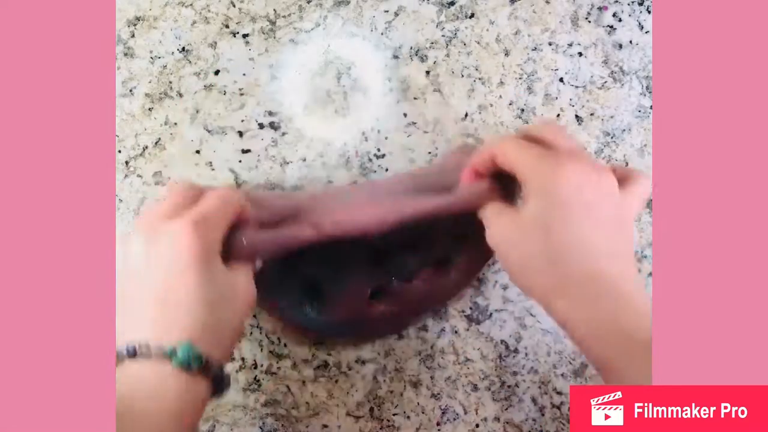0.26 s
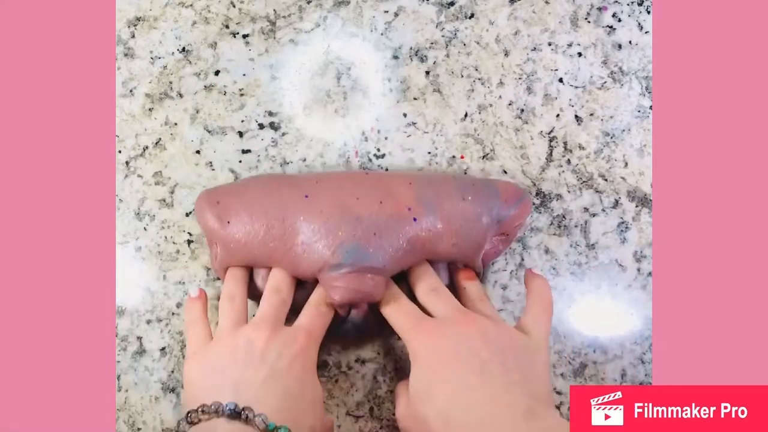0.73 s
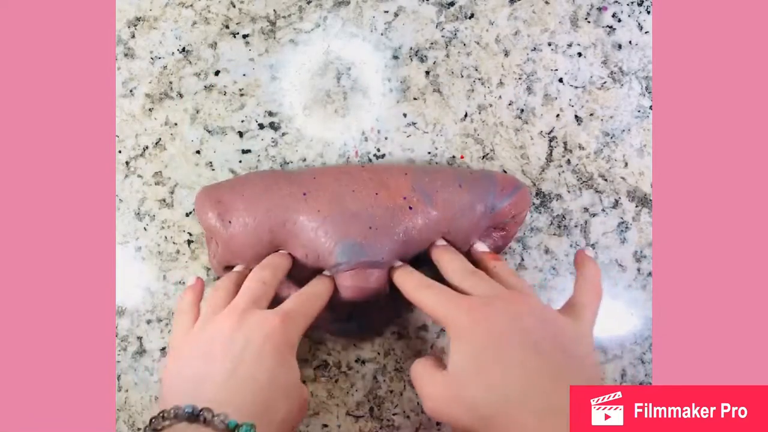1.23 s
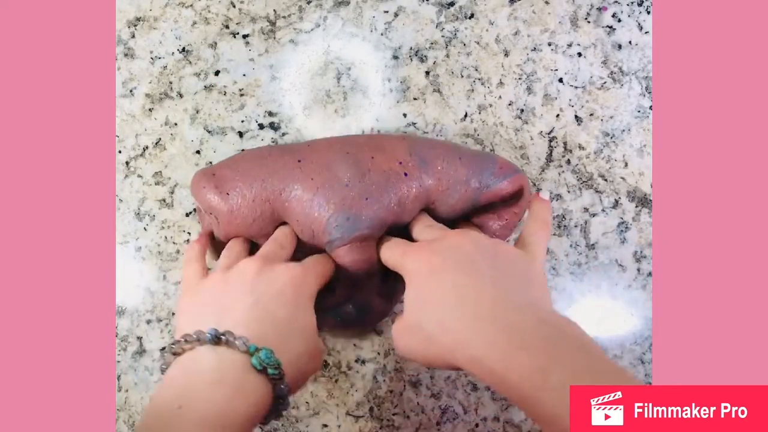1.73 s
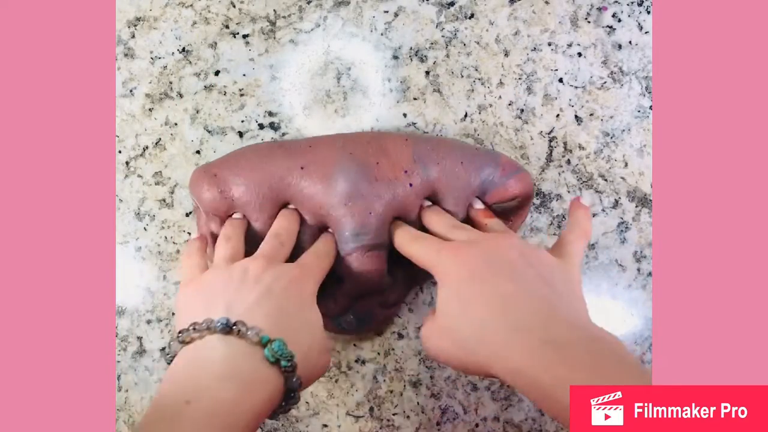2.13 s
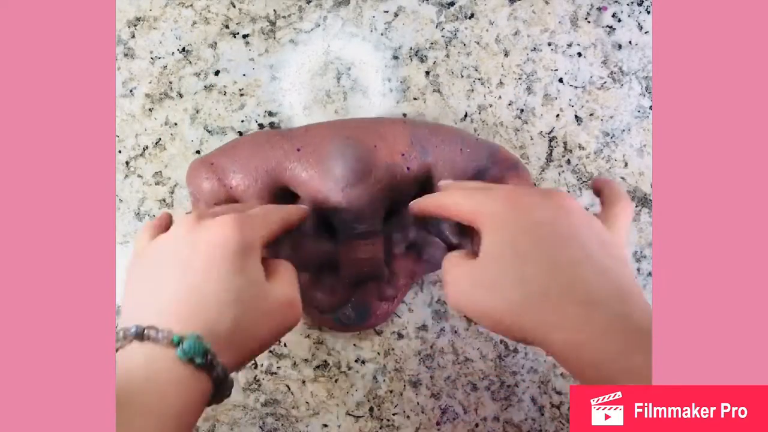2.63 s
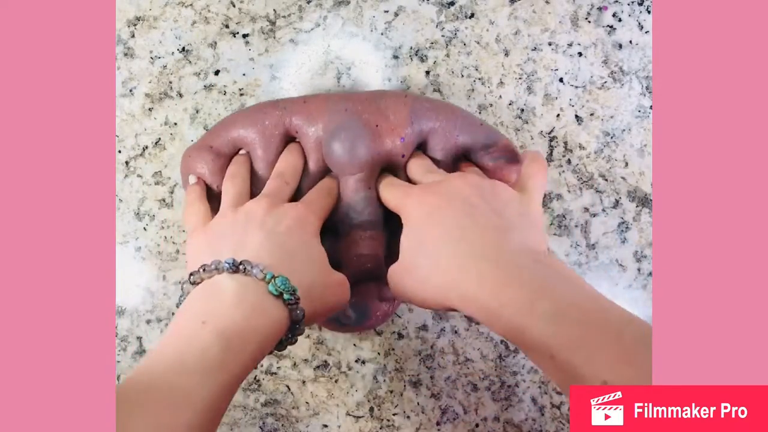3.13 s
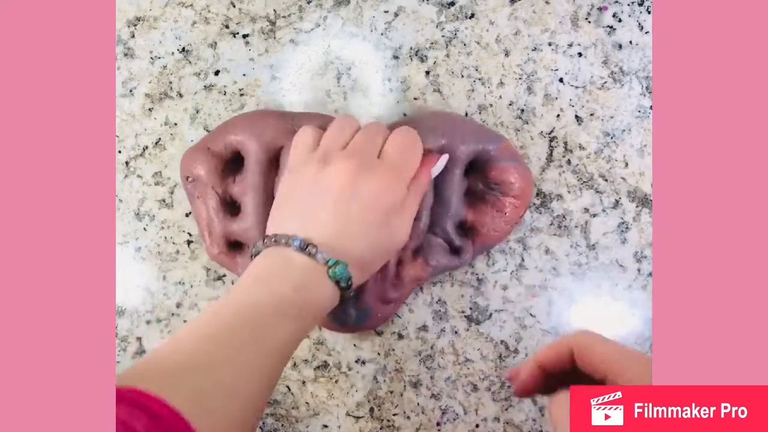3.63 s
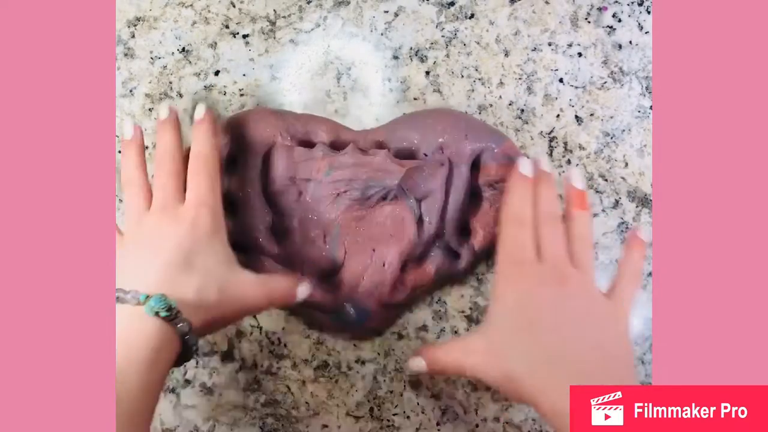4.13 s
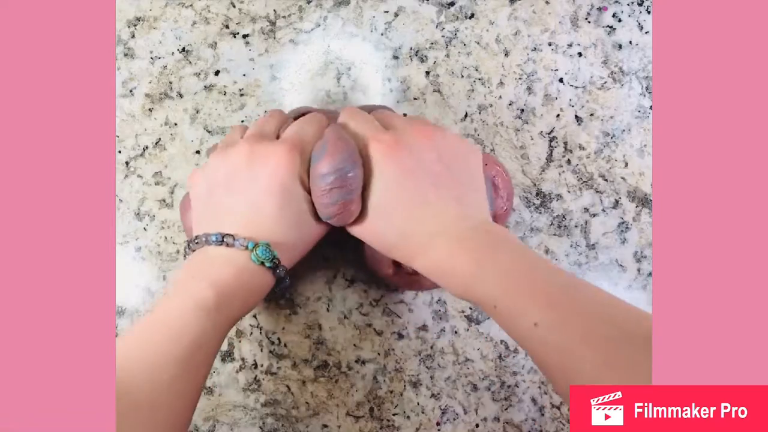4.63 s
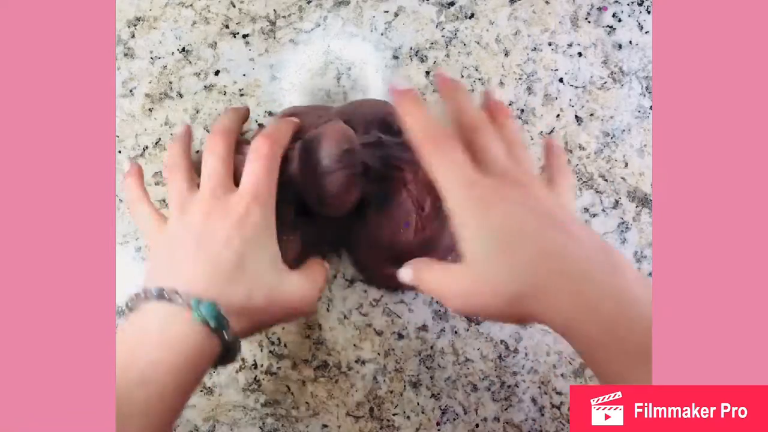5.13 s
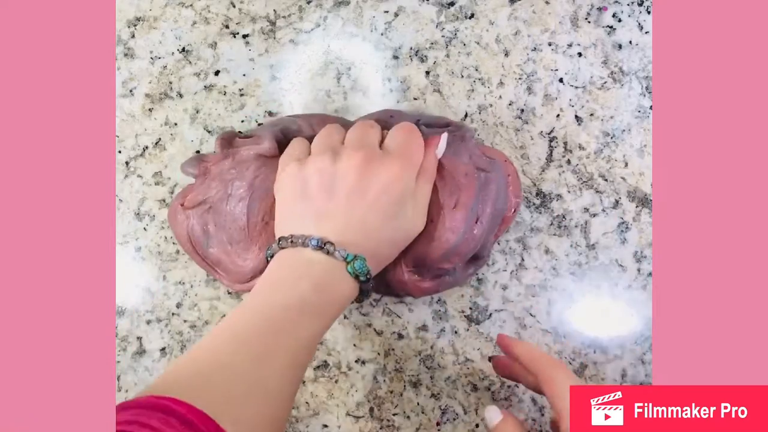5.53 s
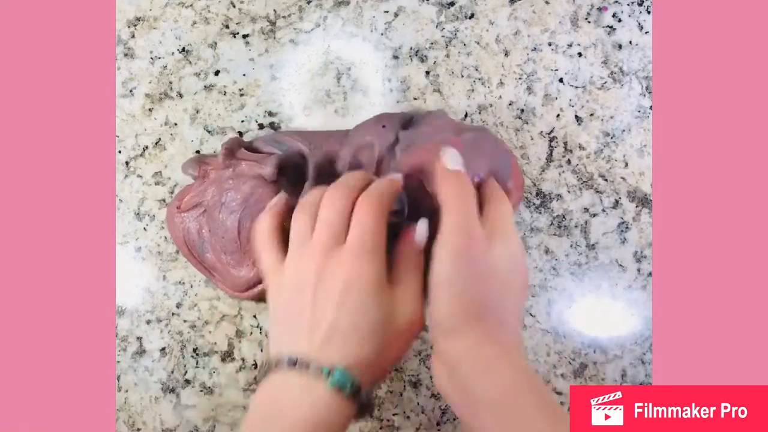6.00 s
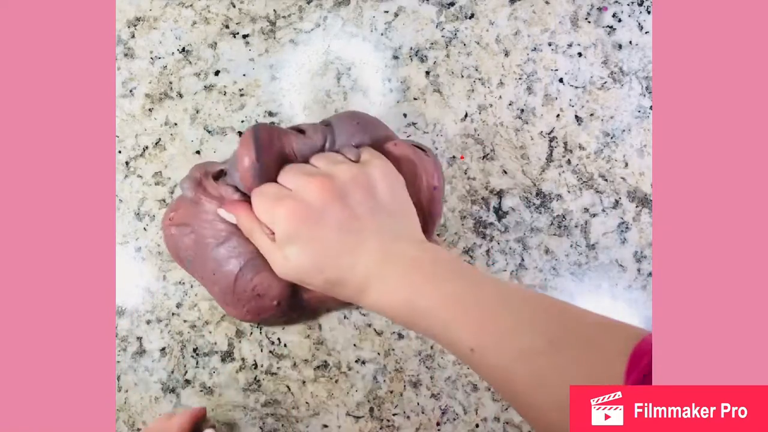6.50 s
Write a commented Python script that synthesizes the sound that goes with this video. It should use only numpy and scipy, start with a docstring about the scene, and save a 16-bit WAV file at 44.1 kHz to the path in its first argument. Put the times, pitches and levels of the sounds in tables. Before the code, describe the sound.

Sticky slime pops and crackles wetly as hands poke, fold and squeeze it on a stone counter, with a few dull thuds.

```python
"""Sticky slime pops and crackles as hands poke, fold and squeeze it on a stone counter.
Trapped air pockets burst with short pops, and the slime peels off the fingers in a wet crackle
with squelching below. The counter carries dull pushes and a few jolts. A small hard room
echoes the pops, over a quiet hum and hiss."""
import sys
import numpy as np
from scipy import signal
from scipy.fft import rfft, irfft, next_fast_len
from scipy.io import wavfile
from scipy.ndimage import uniform_filter1d, map_coordinates

SR = 44100
rng = np.random.default_rng(int(sys.argv[2]) if len(sys.argv) > 2 else 0)


def materialize(psi):
    """Save the field psi as 16-bit PCM at rate SR to the path in sys.argv[1].

    A 1-D psi becomes a single channel; in a 2-D psi each row is a channel.
    """
    bounded = np.clip(np.atleast_2d(psi).T, -1, 1)
    quanta = np.round(bounded * 32767).astype(np.int16)
    wavfile.write(sys.argv[1], SR, quanta)


N = 298116

# Quick echoes off hands, counter and phone: (frequency [Hz], time to fade by 60 dB [s])
NEAR_ECHO = [(200, 0.04), (2000, 0.039), (10000, 0.018)]
# The small room's echo: (frequency [Hz], time to fade by 60 dB [s])
ROOM_ECHO = [(300, 0.18), (10000, 0.093)]
# Bursting air pockets; boom and snap are relative to the pocket's puff of air:
# (time [s], level [dB], pitch [Hz], boom [dB], snap [dB])
AIR_POCKETS = [(0.671, -20, 750, 4, -36), (0.935, -5, 2640, 5, -5), (0.9474, -1.5, 970, -36, -48),
               (0.9548, -10.5, 4500, -2, -24), (1.182, -33.5, 1800, 3, -4), (1.238, -31, 2050, 7, -9),
               (1.4159, -34, 820, 13.5, -30), (1.527, -28, 3900, -19, -52), (1.7322, -15.5, 2600, 6, -5),
               (1.7534, -6, 795, -3, -12), (1.7629, -2.5, 2850, -27, 5), (1.766, -9, 2420, -34, 5),
               (1.7702, -25, 3000, -20, -6), (1.7753, -11.5, 2310, 8.5, -28), (2.499, -30, 5500, -15, -22),
               (2.5064, -8.5, 1165, -6, -24), (2.517, -21.5, 2000, 12, -5), (2.5206, -5, 3500, -3, -6.5),
               (2.5303, -0.5, 1830, -27, -7.5), (2.544, -18.5, 2500, 8.5, -17),
               (2.549, -14.5, 2500, 8, -13), (2.5785, -10, 3000, -6, 0), (2.593, -22.5, 3480, 9, -5),
               (2.8074, -31.5, 1295, 3.5, -15), (3.253, 3.5, 2620, -5.5, -44), (3.2678, -3, 1500, -3, -12),
               (3.2939, -2.5, 3380, 9.5, 2.5), (3.534, -23.5, 1770, -7.5, -21), (3.6023, 7, 826, -3, -60),
               (3.628, 3.5, 1510, -5, -55), (3.6606, -38, 1920, -4, 16.5),
               (3.7068, -17.5, 2200, -2.5, -8.5), (3.742, -25, 2020, -11, 3.5),
               (3.7894, -47, 2400, 2.5, 12.5), (3.9065, -15.5, 3070, -9.5, -2), (4.2221, -27, 1740, 5, -32),
               (4.325, -41.5, 3200, 1, 30.5), (4.4132, -38, 3310, 13, 13), (4.4296, -4.5, 2130, -5, -49),
               (4.4975, -24.5, 1700, -10, -8), (4.5497, -29, 2460, -20, -1), (4.5773, -8, 1570, -2, -7),
               (4.6622, -22.5, 2870, -20, 0), (4.6723, -26.5, 3940, -23, 17), (4.7101, -8.5, 4660, -36, 5),
               (4.7246, -19, 4590, -2.5, 27.5), (4.752, -32, 3770, -19, 5), (4.8148, -19.5, 3830, -59, -18),
               (4.8386, -19.5, 3500, -9, 3.5), (4.9751, -7, 3030, -40, -36),
               (5.381, -14.5, 1300, -0.5, -50), (5.4387, -19, 3320, -5, -4),
               (5.4804, -15.5, 3750, -2.5, 0.5), (5.5418, -32, 2940, -2, 8.5),
               (5.562, 17, 3480, -11.5, -2.5), (5.6808, -20, 2660, -7.5, -6.5),
               (5.755, -37.5, 2500, -25.5, 0.5), (6.198, -29, 1330, -19, -27.5),
               (6.2283, -22.5, 1600, 0.5, -3), (6.3101, -20.5, 2500, -31, 0.5),
               (6.3556, -25, 3000, -13, -12), (6.365, -15.5, 1240, 10, -3.5), (6.3778, -18.5, 3500, 0, 2),
               (6.389, -24.5, 1110, 18, -2), (6.409, -25.5, 2500, -14, -1), (6.4253, -27.5, 4000, -18, 7),
               (6.436, -34, 4000, -18, 6), (6.4433, -7.5, 3800, 0, -6.5), (6.4614, -2, 4150, -6, -4.5),
               (6.499, -28, 3180, 7, 13), (6.5189, -16, 3630, -28, 7), (6.5939, -21, 3250, -20, 5.5)]


def pops():
    """Each pocket tears open: a puff pitched by its size, a snap of wet film, the finger hole booming."""
    out, t = np.zeros(N + SR), np.arange(SR // 20) / SR
    film_band = signal.butter(2, [4500, 10500], "band", fs=SR)
    big_pocket_db = 20  # bigger pockets ring more; at this level the ring is as strong as the puff
    for start, db, hz, boom_db, snap_db in AIR_POCKETS:
        boom = ring(440 * np.exp(rng.normal(0, .1)), cycles=1.1, t=t)
        snap = signal.lfilter(*film_band, rng.standard_normal(len(t)) * np.exp(-t / .00012))
        pop = puff(hz, t) + amp(snap_db) * snap / np.linalg.norm(snap) + amp(boom_db) * boom
        # the pocket's short ring, heard directly and in the near echoes only
        ringing = amp(db - big_pocket_db) * ring(hz, cycles=4, t=t)
        near = amp(-4) * np.roll(echo(NEAR_ECHO), round(.001 * SR))
        near[0] += .9  # the sound that arrives directly
        near[round(.0013 * SR)] += .55  # one bounce off the stone
        room = amp(-13) * np.roll(echo(ROOM_ECHO), round(.008 * SR))
        heard = signal.fftconvolve(pop + ringing, near) + signal.fftconvolve(pop, room)
        out[round(start * SR):][:len(heard)] += amp(db) * heard
    bass_cut = signal.butter(2, 270, "high", fs=SR)  # a small pocket makes no deep bass
    return signal.lfilter(*bass_cut, out[:N])


# Tone of the bright crackle: (frequency [Hz], relative level [dB])
CRACKLE_TONE = [(590, -31.5), (1000, -9), (1430, -2.5), (8850, -7.5), (12700, -14.5), (16000, -32.5)]
# Tone of the low squelch: (frequency [Hz], relative level [dB])
SQUELCH_TONE = [(80, -31.5), (150, 3.5), (300, 0.5), (700, 1), (1400, -8.5), (3000, -28.5)]
# Strokes of the hands in the slime:
# (time of full strength [s], rise [s], hold [s], fade [s], crackle level [dB], squelch level [dB])
HAND_STROKES = [(0.064, 0.29, 0.011, 0.26, -56, -57), (0.328, 0.32, 0.024, 0.36, -61.5, -63.5),
                (0.955, 0.06, 0.0053, 0.052, -38.5, -37.5), (1.767, 0.096, 0.02, 0.017, -40.5, -41),
                (2.529, 0.061, 0.019, 0.029, -43, -39.5), (2.586, 0.018, 0.014, 0.01, -63, -35),
                (3.283, 0.075, .01, 0.051, -44, -42), (3.592, 0.099, 0.16, 0.056, -60.5, -61),
                (3.907, 0.088, 0.087, 0.034, -47.5, -50), (4.3, 0.18, 0.1, 0.083, -52.5, -54.5),
                (4.476, 0.19, 0.2, 0.49, -63, -58.5), (4.981, 0.054, 0.11, 0.057, -44.5, -39),
                (5.164, 0.17, .25, 0.13, -93, -62), (5.52, 0.22, .05, 0.39, -61, -63.5),
                (5.882, 0.044, 0.021, 0.16, -44, -47.5), (5.986, 0.24, 0.038, 0.23, -56, -51.5),
                (6.195, 0.57, 0.16, 0.34, -64.5, -64.5), (6.375, 0.053, 0.0089, 0.059, -52, -37),
                (6.457, 0.13, .15, 0.083, -60, -64), (6.713, 0.019, .05, .1, -52, -50.5)]


def peeling():
    """Countless threads of slime let go in a wet crackle while lumps squelch; stray threads tick."""
    _, rises, _, fades, crackle_db, squelch_db = np.transpose(HAND_STROKES)
    threads = patchy(grit(per_second=500, spread_db=1.5, life_s=.002, steady=1), depth_db=2)
    lumps = patchy(grit(per_second=120, spread_db=1.8, life_s=.004, steady=.6), depth_db=2.5)
    ticks = grit(per_second=14, spread_db=2, life_s=.002, steady=0)
    crackle = stroke_gain(crackle_db, rises, fades, rest_db=-81) * coloured(threads, CRACKLE_TONE)
    squelch = stroke_gain(squelch_db, rises, fades, rest_db=-78) * coloured(lumps, SQUELCH_TONE)
    return crackle + squelch + amp(-82) * coloured(ticks, CRACKLE_TONE)


def pushes():
    """Each stroke slowly presses on the counter and lets go, making a dull thump."""
    squelch_db = np.transpose(HAND_STROKES)[-1]
    push_db = -24.5 + .6 * squelch_db  # grows with the squelch, but less steeply
    pressure = stroke_gain(push_db, rise_s=.16, fade_s=.1, rest_db=-73.5)
    rumble = coloured(rng.standard_normal(N), [(15, -18), (40, 8), (75, 7), (110, -2.5), (250, -65.5)])
    flutter = amp(wobble(per_second=27))
    return pressure * flutter * rumble


# The lump of slime jolting on the counter: (time [s], level [dB])
LUMP_JOLTS = [(3.604, -10), (4.219, -12.5), (5.136, -8.5), (5.166, -3.5), (5.209, -14.5), (5.238, -1.5),
              (5.282, -12), (5.323, -11.5), (5.361, -16)]


def jolts():
    """The lump knocks the counter: a low thud with a wet smack."""
    out, t = np.zeros(N + SR), np.arange(SR // 10) / SR
    for start, db in LUMP_JOLTS:
        smack = signal.fftconvolve(puff(hz=550, t=t), echo(NEAR_ECHO))[:len(t)]
        thud = ring(75.2 * np.exp(rng.normal(0, .21)), cycles=.83, t=t)
        out[round(start * SR):][:len(t)] += amp(db) * (thud + amp(-17.5) * smack)
    return out[:N]


# Tone of the room's rumble and hiss: (frequency [Hz], relative level [dB])
HISS_TONE = [(12, -35.5), (20, 7), (86, -32), (123, -14), (228, -33.5), (1290, -40.5), (12100, -49),
             (16000, -47.5)]
# Hum of the electricity supply: (frequency [Hz], level [dB])
MAINS_HUM = [(118.4, -86.5)]


def room_tone():
    """Quiet hiss and rumble drift gently in level over a faint electrical hum."""
    t = np.arange(N) / SR
    hum = sum(np.sqrt(2) * amp(db) * np.sin(2 * np.pi * hz * t) for hz, db in MAINS_HUM)
    hiss_db = -61.5 + 1.6 * wobble(per_second=.77)
    return amp(hiss_db) * coloured(rng.standard_normal(N), HISS_TONE) + hum


def puff(hz, t):
    """One soft push of air and its recoil, strongest near hz, with energy 1."""
    u = 2 * np.pi * np.sqrt(2) * hz * t
    x = u * u * (3 - u) * np.exp(-u)
    return x / np.linalg.norm(x)


def ring(hz, cycles, t):
    """A tone that starts softly and dies away over a few cycles, with energy 1."""
    phase = 2 * np.pi * hz * t
    x = np.sin(phase) * np.exp(-hz * t / cycles) * (1 - np.exp(-phase))
    return x / np.linalg.norm(x)


def echo(fade_times):
    """A tail of noise whose frequencies fade at their own speeds, with energy 1."""
    hz, t, spectrum = signal.stft(rng.standard_normal(SR // 6), SR, nperseg=128)
    fade = amp(-60 * t / look_up(fade_times, hz)[:, None])
    x = signal.istft(spectrum * fade, SR, nperseg=128)[1]
    return x / np.linalg.norm(x)


def stroke_gain(levels_db, rise_s, fade_s, rest_db):
    """Each stroke rises, holds and fades; between strokes the slime creeps at rest_db."""
    t = np.arange(N) / SR
    swell_db = 30  # how far a stroke climbs in its rise and sinks in its fade
    peaks, _, holds, *_ = np.transpose(HAND_STROKES)
    power = np.full(N, amp(2 * rest_db))
    for peak, hold, db, rise, fade in np.broadcast(peaks, holds, levels_db, rise_s, fade_s):
        away = np.maximum(peak - t, 0) / rise + np.maximum(t - peak - hold, 0) / fade
        power += amp(2 * (db - swell_db * away))
    return np.sqrt(power)


def grit(per_second, spread_db, life_s, steady):
    """Noise that flares in tiny random bursts on top of a steady part."""
    flares = (rng.random(N) < per_second / SR) * amp(2 * spread_db * rng.exponential(size=N))
    power = signal.lfilter([1], [1, -np.exp(-1 / (life_s * SR))], flares)
    return np.sqrt(power / power.mean() + steady) * rng.standard_normal(N)


def patchy(x, depth_db):
    """Shifting folds and hollows make random patches of time and pitch louder or softer."""
    spectrum = signal.stft(x, nperseg=512)[2]
    patches = uniform_filter1d(rng.standard_normal(spectrum.shape), size=5, axis=0)
    patches = uniform_filter1d(patches, size=6, axis=1)
    return signal.istft(spectrum * amp(depth_db * unit(patches)), nperseg=512)[1][:N]


def wobble(per_second):
    """A smooth curve through evenly spaced random values."""
    values = rng.standard_normal(int(N * per_second / SR) + 4)
    return map_coordinates(values, [np.arange(N) * per_second / SR])


def coloured(x, tone):
    """Shape x with a tone table, at average power 1."""
    return unit(filtered(x, lambda hz: amp(look_up(tone, hz))))


def filtered(x, gain_at):
    """Turn each frequency of x up or down by gain_at(hz)."""
    size = next_fast_len(N + SR // 2)
    return irfft(rfft(x, size) * gain_at(np.fft.rfftfreq(size, 1 / SR)), size)[:N]


def look_up(table, hz):
    """Read between the rows of a (frequency, value) table, on a log frequency scale."""
    frequencies, values = np.transpose(table)
    return np.interp(np.log(hz + 1), np.log(frequencies + 1), values)


def amp(db):
    """Turn decibels into a multiplier."""
    return 10 ** (np.asarray(db) / 20)


def unit(x):
    """Scale x to average power 1."""
    return x / np.sqrt(np.mean(x ** 2) + 1e-20)


def scene():
    """Add slime, counter and room into one channel."""
    return (pops() + peeling() + pushes() + jolts() + room_tone())[None]


def record(dry):
    """Round off the loudest peaks and cut the highest treble."""
    ceiling, top_hz, slope_hz = .92, 16800, 1800
    softened = dry[0] / (1 + np.abs(dry[0] / ceiling) ** 8) ** (1 / 8)
    return filtered(softened, lambda hz: np.clip((top_hz - hz) / slope_hz, 0, 1) ** 2)[None]


dry = scene()
out = record(dry)
materialize(out)
```